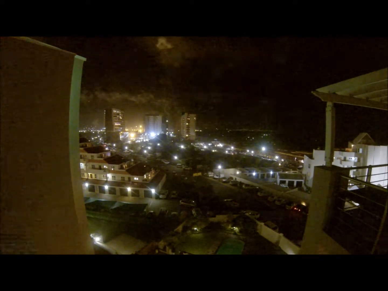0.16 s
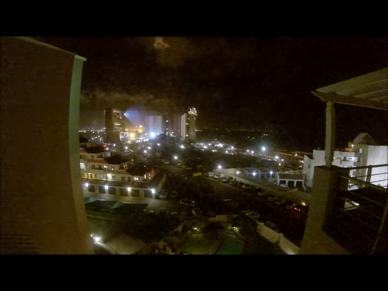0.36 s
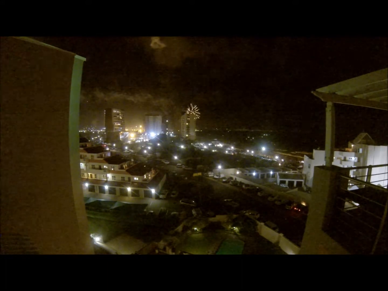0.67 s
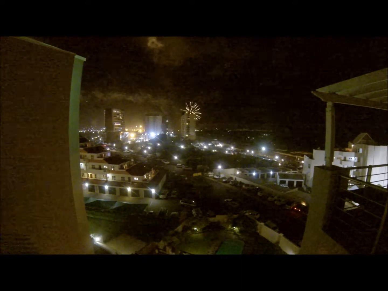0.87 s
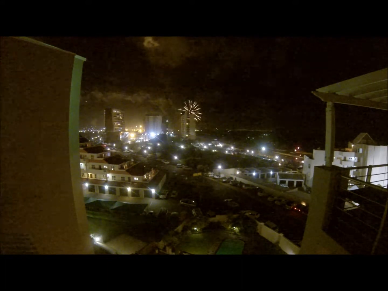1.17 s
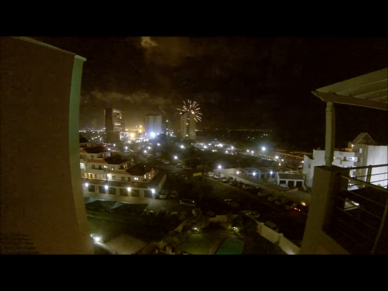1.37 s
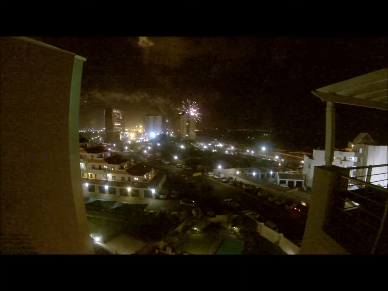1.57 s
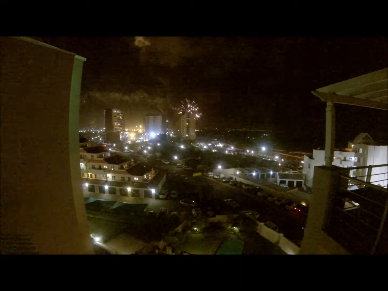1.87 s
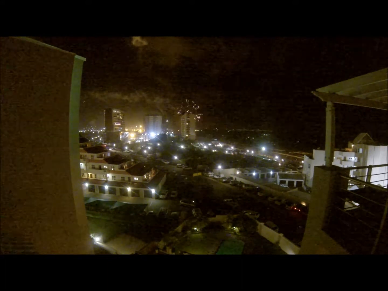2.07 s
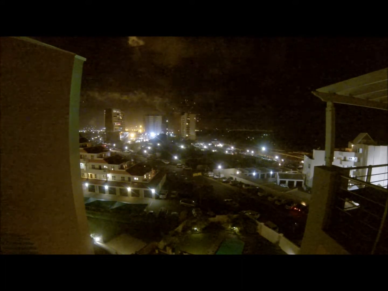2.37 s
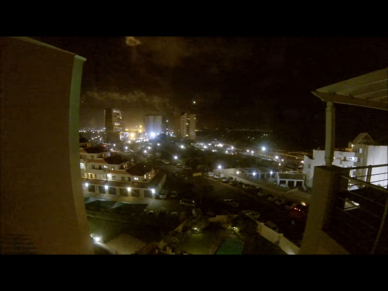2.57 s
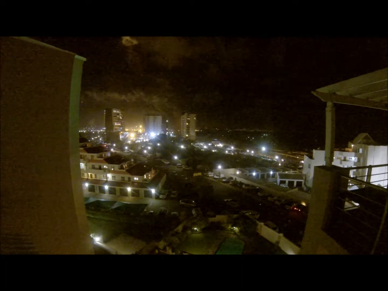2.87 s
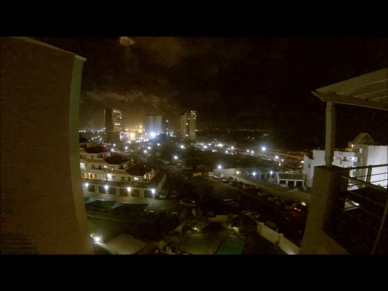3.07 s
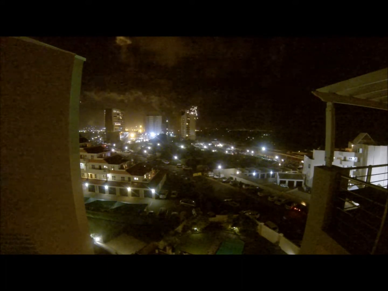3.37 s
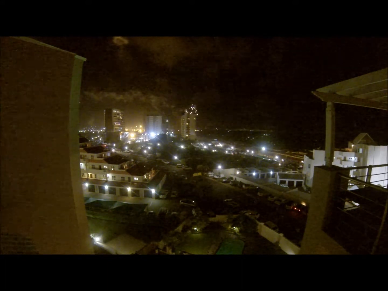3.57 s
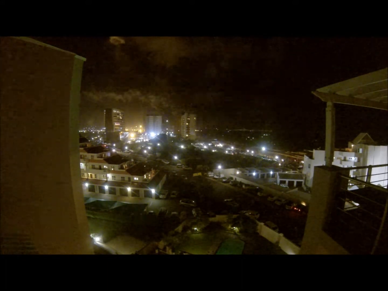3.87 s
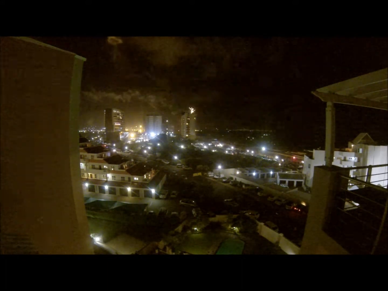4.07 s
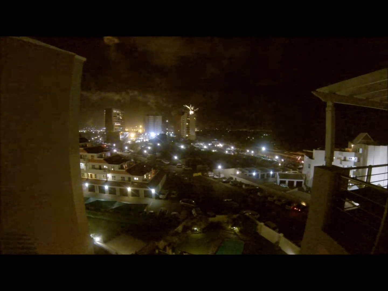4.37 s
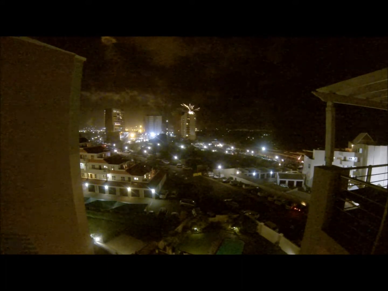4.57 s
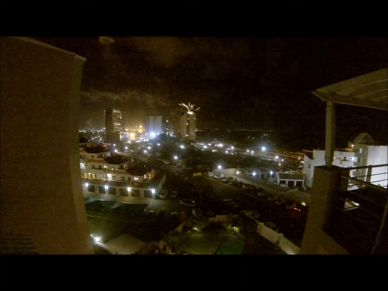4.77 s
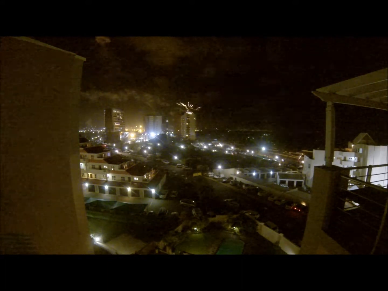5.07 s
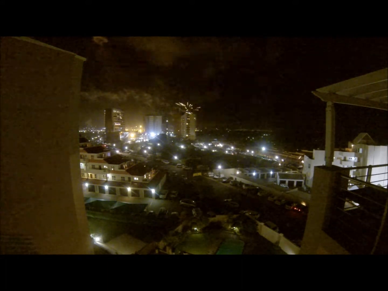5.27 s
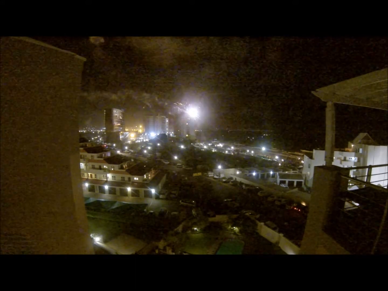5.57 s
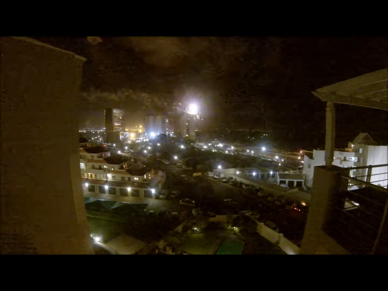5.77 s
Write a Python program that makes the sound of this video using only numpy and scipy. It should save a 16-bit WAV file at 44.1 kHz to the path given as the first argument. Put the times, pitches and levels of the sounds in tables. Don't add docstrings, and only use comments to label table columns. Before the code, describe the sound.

Distant fireworks crack and thump over a town at night, echoing off facades above a low rolling rumble and faint camera hiss.

```python
import sys
import numpy as np
from scipy import signal
from scipy.fft import rfft, irfft
from scipy.io import wavfile
from scipy.ndimage import uniform_filter1d

SR = 44100
rng = np.random.default_rng(int(sys.argv[2]) if len(sys.argv) > 2 else 0)


def elevation(decibels):
    levels = np.asarray(decibels, float)
    return 10 ** (levels / 20)


def transcribe(u):
    v = np.clip(np.atleast_2d(u).T, -1, 1)
    q = np.round(v * 32767).astype(np.int16)
    wavfile.write(sys.argv[1], SR, q)


N = 261513
TIME = np.arange(N) / SR

# (frequency [Hz], density [dB per Hz])
HISS_SPECTRUM = [(150, -27.5), (250, -2.5), (358, -8.5), (478, -6), (708, -12), (1080, -21), (1380, -22),
                 (1610, -18), (2000, -22.5), (5770, -29.5), (10500, -37.5), (13300, -34.5), (14800, -53.5)]
# (frequency [Hz], level [dB])
CIRCUIT_TONES = [(3467, -87.5), (5636, -92.5), (11294, -102), (13618, -89), (13642, -86.5)]
# (frequency [Hz], density [dB per Hz])
DEEP_SPECTRUM = [(15, -29), (28, -12), (60, 12), (80, -1.5), (125, -29), (200, -39.5)]
# (frequency [Hz], width [Hz], level [dB])
BALCONY_MODES = [(90, 15, 0), (145, 7.2, -7.5), (161.1, 11, -5.5), (213, 12, 2), (253, 27, -6.5)]
# (frequency [Hz], width [Hz], level [dB])
HOUSING_MODES = [(1084, 86, -0.5), (1285, 60, -3.5), (1549, 156, -2.5), (1750, 128, -1), (1858, 210, -6.5),
                 (2357, 167, -7), (2520, 360, -12.5), (3616, 190, -16), (3950, 230, -24.5),
                 (5440, 200, -42)]
# (start [s], length [s], pitch [Hz], peak [dB])
SWELLS_OF_ECHO = [(-.023, 0.086, 47.4, -23), (0.062, .138, 47.5, -27.5), (0.215, .44, 47.93, -25.5),
                  (.572, 0.2, 49.2, -32), (0.603, 0.61, 49.25, -27.5), (1.037, 0.22, 48.24, -27.5),
                  (1.024, 0.4, 46.1, -30.5), (1.407, .29, 47.66, -30), (1.705, 0.12, 47.4, -34.5),
                  (1.919, 0.16, 45.1, -35.5), (1.99, 0.31, 46.87, -31), (2.4, 0.077, 46.8, -28),
                  (2.408, 0.36, 45.5, -30), (2.832, 0.14, 48.45, -38), (2.953, 0.12, 48.57, -33),
                  (3.076, .14, 49.1, -51), (3.25, 0.28, 47.85, -33), (3.535, 0.17, 48.2, -40.5),
                  (3.74, 0.19, 46.65, -32), (3.935, .36, 48.55, -25), (4.277, 0.17, 48.86, -32),
                  (4.314, 0.5, 49.3, -26), (4.712, 0.3, 47.9, -28), (4.913, 0.28, 46.95, -28.5),
                  (5.189, .234, 46.93, -31), (5.379, .21, 47.27, -35), (5.61, 0.5, 46.8, -33.5)]
# (calm [dB], share of a swell [dB], first roll [dB], roll t60 [s], lumps [dB])
MODE_ANSWERS = [
    (-51, -19, -31, 1.7, 2),
    (-48, -30.5, -29, 1.64, 2),
    (-63.5, -26.5, -35, 1.6, 3),
    (-65, -42.5, -49.5, 1.4, 1.06),
]
# (hum of the first roll [dB], tail of a burst [dB], tail t60 [s],
# share of the lulls [0-1], hold of the roll [s])
MODE_LINGERS = [(-49.5, -51.5, 4.3, 0.25, 0.012), (-39, -54, 2.2, 0.02, .01),
                (-43.5, -47, 3.2, 0.41, 0.036), (-59, -54, 2.4, 0, 0.15)]
# (start [s], length [s], first pitch [Hz], settled pitch [Hz], level [dB])
FAR_WHISTLES = [(3.38, .16, 1090, 1100, -71), (3.56, .22, 1090, 1105, -66), (3.92, .1, 1110, 1130, -63),
                (4.16, .13, 1120, 1100, -61), (4.25, .3, 1780, 1757, -72), (5.17, .3, 975, 1108, -59),
                (5.44, .24, 1105, 1146, -62), (5.66, .36, 1140, 1138, -63), (5.6, .09, 1860, 1880, -72),
                (5.84, .08, 1860, 1800, -72)]
# (time [s], peak [dB], pitch [Hz])
FAR_POPS = [(0.2563, -40, 1030), (0.4991, -37.5, 1104), (1.094, -41, 1500), (.995, -44, 1750),
            (1.16, -36, 1030), (1.1888, -41.5, 1650), (1.881, -43.5, 1670), (2.909, -47, 1675),
            (3.1274, -64, 1095), (3.833, -50, 1084), (4.375, -66, 1774), (4.5364, -46, 1035),
            (5.403, -46.5, 1110), (5.8112, -39, 1673), (5.76, -45, 1700)]
# (time [s], length [s], pitch [Hz], peak [dB])
EARLIER_THUD = (-.0027, .0112, 180, -10)
# (time [s], length [s], pitch [Hz], peak [dB])
ROLLING_THUDS = [(.029, 0.016, 174, -16.5), (0.067, 0.015, 200, -23), (.084, 0.036, 174, -25.5),
                 (.125, 0.013, 200, -24), (.166, 0.014, 167, -22), (.245, 0.047, 164.6, -24.5),
                 (1.941, 0.13, 212.7, -46.5), (3.236, 0.18, 207, -48), (3.813, 0.12, 208, -44.5),
                 (4.751, 0.18, 221.1, -41.5), (5.7, 0.12, 210, -46.5), (1.076, 0.064, 616, -55),
                 (.63, 0.1, 94, -35), (1.151, 0.12, 95, -34), (1.591, .12, 89, -35), (2.13, .12, 89, -35),
                 (4.88, .15, 97, -35), (5.341, 0.11, 92, -40), (.47, 0.03, 97, -39),
                 (2.66, 0.071, 100, -38.5), (0.79, .1, 227, -42), (0.963, 0.092, 270, -47),
                 (1.131, 0.097, 217, -38.5), (1.1, 0.038, 270, -42), (0.17, 0.063, 270, -35)]
WALL_DELAYS = [0, .0022, .0045, .008, .0115, .016, .030, .037, .054, .078, .097, .160, .164, .169, .174,
               .179, .209]
# (boom [dB], knock [dB], crack [dB])
WALL_LEVELS = [(5, -1, -13), (-16, 0.5, 8.5), (-2, -16.5, 2), (-36, -2, 1), (2.5, -19.5, -21),
               (-6, -2, -43), (2, -2, -2.5), (-1, -10.5, -16), (0.5, -4, -18), (-17, -5.5, -29),
               (-39, -28, -20), (-29, -35, -22), (-26, 1, -18), (-29, -10.5, -33), (-25, -13, -40),
               (-19, -7, -12), (-2, -14, -22)]
SCATTER_DELAYS = [.002, .01, .162, .18, .05]
# (knock [dB], crack [dB], t60 [s])
TOWN_SCATTER = [(-12, -3.5, 0.041), (-21.5, -6.5, 0.42), (-14.5, -4, 0.13), (-22, -10, 0.41),
                (-30, -37, 3.5)]
# (delay [s], level [dB])
SHOCK_ARRIVALS = [(0, -8), (.0010, -3), (.0030, 0), (.0046, 0), (.0062, -4), (.0085, -4), (.0125, -8),
                  (.016, -9), (.161, -10), (.1635, -11), (.168, -13), (.171, -12), (.175, -13), (.178, -17)]
# (frequency [Hz], width [Hz], level [dB])
KNOCK_RING = [(104, 36, -6), (213.5, 45.3, 0), (233.4, 53, 2.5), (308.5, 98, -4.5), (415, 47.7, -5.5),
              (468, 55.6, -7.5), (588, 107, -18.5), (704, 230, -45)]
# (frequency [Hz], width [Hz], level [dB])
CRACK_RING = [(983, 166, -4.5), (1063, 78, 5.5), (1249, 118, 0.5), (1260, 180, -11), (1514, 158, -2),
              (1780, 388, -4.5), (2076, 227, -6.5), (2514, 374, -9), (2700, 524, -12), (3546, 126, -18),
              (4120, 460, -31.5), (5750, 400, -45.5)]
# (frequency [Hz], width [Hz], level [dB])
SHOCK_RING = [(256, 65, -12.5), (1216, 240, 4.5), (1800, 250, 2.5), (2730, 440, -14.5), (3470, 270, -16.5),
              (5500, 550, -46.5)]
# (frequency [Hz], width [Hz], level [dB])
FACADE_NOTE = [(354, 22.3, 0.5)]
# (time [s], low [dB], crack [dB], shock front [dB], far facade [dB])
FIREWORKS = [(1.2680, -23.5, -23.5, -25, -3), (2.4100, -25.5, -26.5, -26, -2.5),
             (4.0075, -25, -26.5, -24, -2.5), (5.0256, -23, -30, -36, -4.5)]


def unit(x):
    return x / np.sqrt(np.mean(x ** 2))


def fade(t, t60):
    return (t >= 0) * np.exp(-np.log(1000) * np.maximum(t, 0) / t60)


def hump(start, length):
    return np.sin(np.pi * np.clip((TIME - start) / length, 0, 1))


def blend(*gains):
    return np.sqrt(sum(g ** 2 for g in gains))


def tone(hz):
    return np.sqrt(2) * np.sin(2 * np.pi * np.cumsum(hz) / SR)


def walk(rate):
    hold = int(SR / rate)
    steps = np.repeat(rng.standard_normal(SR)[:N // hold + 1], hold)
    return uniform_filter1d(uniform_filter1d(steps, hold), hold)[:N]


def ring(x, modes):
    return sum((-1) ** k * elevation(db) * signal.lfilter(*signal.iirpeak(hz, hz / width, SR), x)
               for k, (hz, width, db) in enumerate(modes))


def lowpass(x, order, hz):
    return signal.sosfilt(signal.butter(order, hz, fs=SR, output="sos"), x)


def coloured(spectrum):
    hz, db = np.transpose(spectrum)
    f = np.arange(1, N // 2 + 2) * SR / N
    gain = elevation(np.interp(np.log(f), np.log(hz), db, -150, -150))
    return unit(irfft(rfft(rng.standard_normal(N)) * gain, N))


def camera_noise():
    frame_hz, buzz_db = 23.976, -71
    hiss = elevation(-61.5 + .8 * walk(40)) * coloured(HISS_SPECTRUM)
    whine = sum(elevation(db + 1.7 * walk(28)) * tone(hz + 6.0 * walk(54)) for hz, db in CIRCUIT_TONES)
    ticks = fade(TIME % (1 / frame_hz), .012) * elevation(buzz_db + np.minimum(6 * walk(24), 5))
    buzz = ticks * unit(ring(rng.standard_normal(N), [(11900, 330, -4.5), (8550, 890, -8.5)]))
    return hiss + whine + buzz


def answer(swell, calm_db, share_db, roll_db, roll_t60, lumps_db, hum_db, tail_db, tail_t60, follows, hold):
    tail_lag_s, hum_t60_s, lumps_per_s = .046, 8.9, 9
    full_db, lull_s = -27, .13
    tails = (elevation(tail_db) * fade(TIME - row[0] - tail_lag_s, tail_t60) for row in FIREWORKS)
    lull = np.minimum(uniform_filter1d(swell, int(lull_s * SR)) / elevation(full_db), 1) ** follows
    steady = lull * blend(elevation(calm_db), elevation(hum_db) * fade(TIME, hum_t60_s), *tails)
    roll = elevation(roll_db) * fade(np.maximum(TIME - hold, 0), roll_t60)
    level = blend(steady, elevation(share_db) * swell, roll)
    return level * elevation(lumps_db * walk(lumps_per_s))


def rumble():
    calm_db, overtone_db, murmur_db = -51.5, -22.5, -9.5
    start, length, pitch_hz, _ = np.transpose(SWELLS_OF_ECHO)
    swell = blend(elevation(calm_db), *(elevation(db) * hump(s, long) for s, long, _, db in SWELLS_OF_ECHO))
    centre = start + length / 2
    order = np.argsort(centre)
    hz = np.interp(TIME, centre[order], pitch_hz[order]) + 1.481 * walk(12)
    deepest = swell * (tone(hz) - elevation(overtone_db + 3 * walk(6)) * tone(3 * hz))

    second_gain, third_gain, fourth_gain, housing_gain = (
        answer(swell, *a, *b) for a, b in zip(MODE_ANSWERS, MODE_LINGERS))
    noise = rng.standard_normal((5, N))
    second = second_gain * unit(ring(ring(noise[0], BALCONY_MODES[:1]), [(87, 100, 0)]))
    third = third_gain * unit(ring(ring(noise[1], BALCONY_MODES[1:3]), [(144.5, 180, 0)]))
    fourth = fourth_gain * unit(ring(ring(noise[2], BALCONY_MODES[3:]), [(210, 83, 0)]))
    middle_gain = np.sqrt(fourth_gain * housing_gain) * elevation(7.5 + murmur_db)
    middle = middle_gain * unit(ring(ring(noise[3], KNOCK_RING[3:]), [(425, 650, 0)]))
    dull = lowpass(noise[4], 1, 1800)
    housing = housing_gain * elevation(2.0 * walk(20)) * unit(ring(dull, HOUSING_MODES))
    deep_air = elevation(-47 + 3.8 * walk(3.8)) * coloured(DEEP_SPECTRUM)
    return deepest + second + third + fourth + middle + housing + deep_air


def whistles():
    settle_share, flutter_db = .25, 3
    out = np.zeros(N)
    for s, length, first_hz, settled_hz, db in FAR_WHISTLES:
        slide = np.exp(-np.maximum(TIME - s, 0) / (settle_share * length))
        hz = settled_hz + (first_hz - settled_hz) * slide
        inside = np.minimum(2 * hump(s, length), 1)
        level = elevation(db + flutter_db * walk(30) + 3 * walk(70))
        out += inside * level * tone(hz + 9 * walk(40))
    return out


def pops():
    out, noise = np.zeros(N), rng.standard_normal(N)
    for s, db, hz in FAR_POPS:
        t = TIME - s + .003
        puff = noise * (fade(t, .09) - fade(t, .03))
        puff = ring(ring(puff, [(hz, 500, 0)]), [(hz, 900, 0)])
        out += elevation(db - 8.5) * puff / np.max(np.abs(puff))
    return out


def thuds():
    return sum(-elevation(db) * np.sin(2 * np.pi * hz * (TIME - s)) * hump(s, length)
               for s, length, hz, db in [EARLIER_THUD, *ROLLING_THUDS])


def path():
    facade_s = .157
    wash_s, wash_db = .15, -24.5
    t = TIME[:2 * SR]
    arrivals = np.zeros((4, len(t)))
    for k, (delay, db) in enumerate(zip(WALL_DELAYS, WALL_LEVELS)):
        arrivals[:3, int(delay * SR)] += elevation(db) * (-1) ** k
    for k, (delay, db) in enumerate(SHOCK_ARRIVALS):
        arrivals[3, int(delay * SR)] += elevation(db) * (-1) ** k

    grainy = rng.standard_normal((2, len(t))) * elevation(2 * walk(150.2)[:len(t)])
    for start, (knock_db, crack_db, t60) in zip(SCATTER_DELAYS, TOWN_SCATTER):
        arrivals[1:3] += elevation([[knock_db - 17], [crack_db - 23.5]]) * grainy * fade(t - start, t60)
    arrivals[2] += elevation(wash_db) * grainy[0] * hump(-wash_s / 4, wash_s)[:len(t)]

    split = arrivals[:, None] * [t < facade_s, t >= facade_s]
    soft = lowpass(split[:2], 2, 700)
    sharp = lowpass(split[2:], 4, 6400)
    boom = ring(soft[0], [(161.0, 12.3, 0)])
    knock = ring(soft[1], KNOCK_RING) + [[0], [1]] * ring(soft[1], FACADE_NOTE)
    crack = ring(sharp[0], CRACK_RING)
    front = ring(sharp[1], SHOCK_RING)
    return np.array([p / np.max(np.abs(p)) for p in (boom, knock, crack, front)]).swapaxes(0, 1)


def bursts():
    (near, far), out = path(), np.zeros(N)
    for s, low_db, crack_db, front_db, facade_db in FIREWORKS:
        part = out[int(s * SR):][:near.shape[1]]
        sound = elevation([low_db, low_db, crack_db, front_db]) @ (near + elevation(facade_db) * far)
        part += sound[:len(part)]
    return out


def scene():
    return (rumble() + whistles() + pops() + thuds() + bursts())[None]


def top_cut(x):
    return signal.sosfilt(signal.butter(12, 14910, fs=SR, output="sos"), x)


def record(dry):
    x = signal.sosfilt(signal.butter(2, 22, "high", fs=SR, output="sos"), dry)
    fade_in, fade_out = TIME / .001, (N / SR - TIME) / .006
    mix = (x + camera_noise()) * np.minimum(np.minimum(fade_in, fade_out), 1)
    return top_cut(mix)


dry = scene()
out = record(dry)
transcribe(out)
```